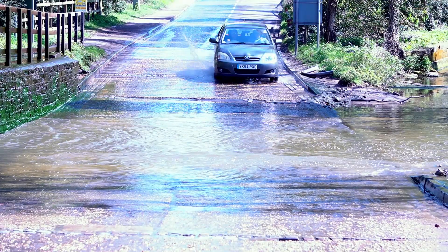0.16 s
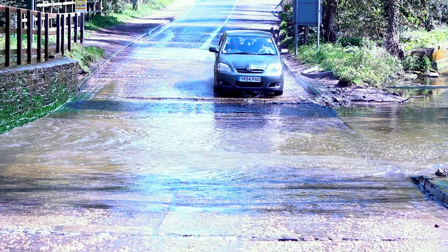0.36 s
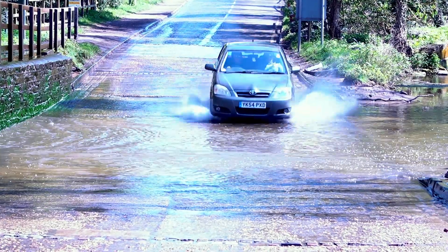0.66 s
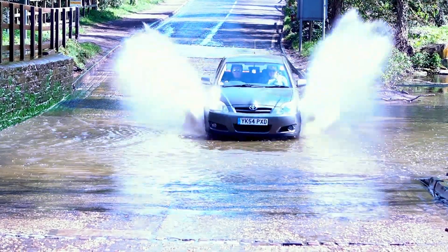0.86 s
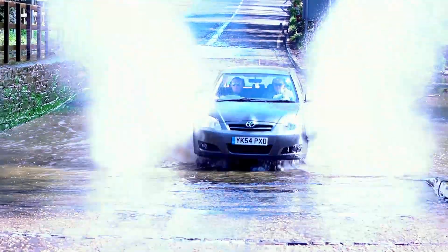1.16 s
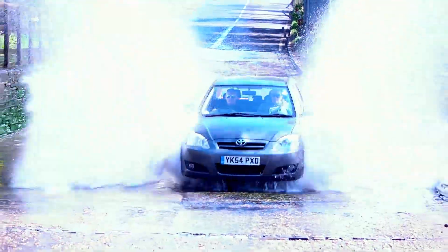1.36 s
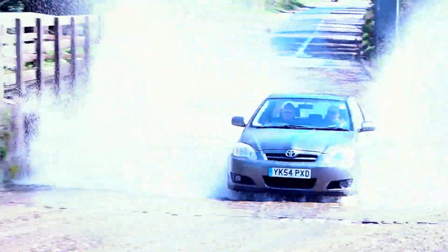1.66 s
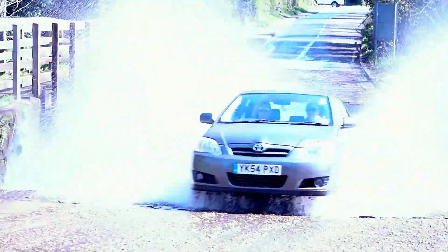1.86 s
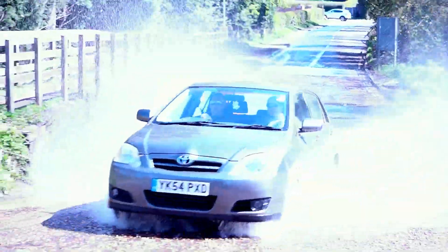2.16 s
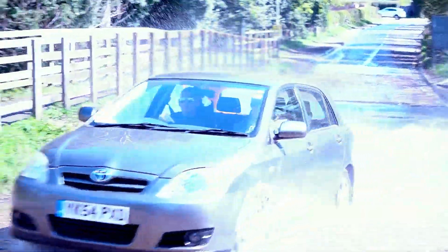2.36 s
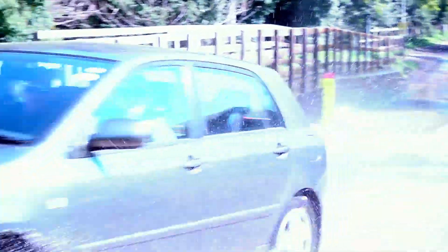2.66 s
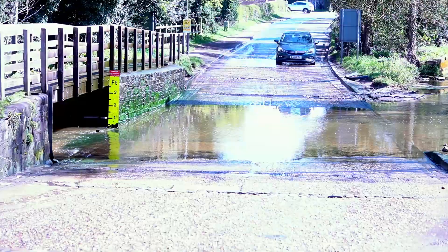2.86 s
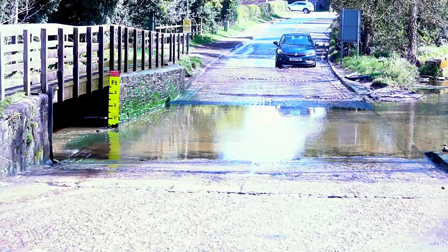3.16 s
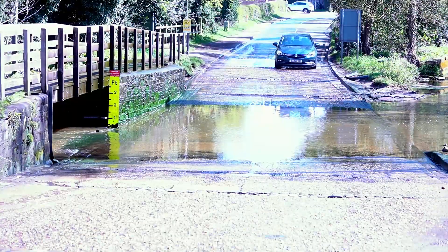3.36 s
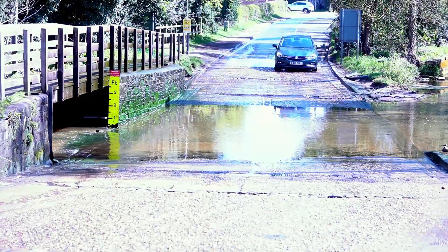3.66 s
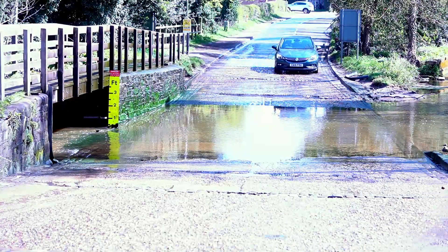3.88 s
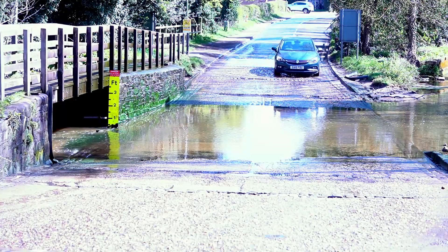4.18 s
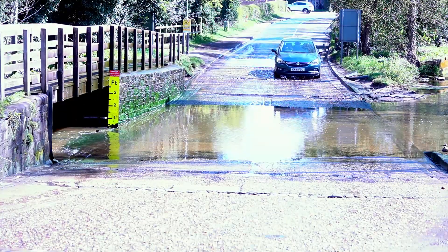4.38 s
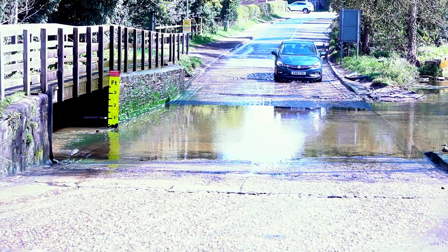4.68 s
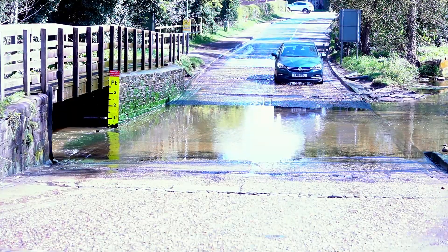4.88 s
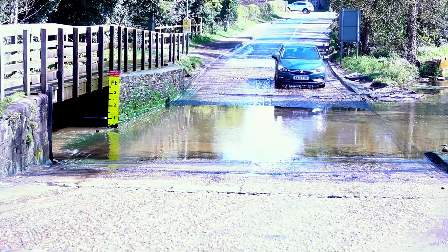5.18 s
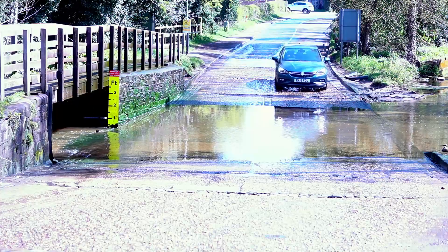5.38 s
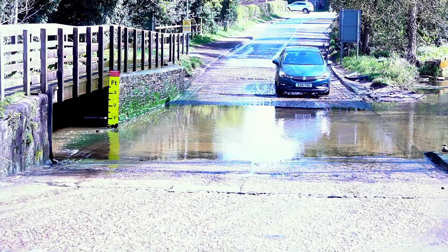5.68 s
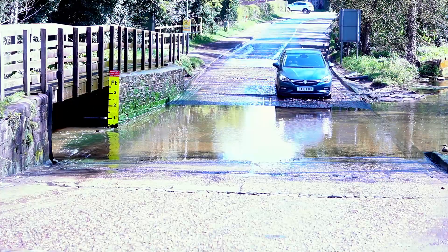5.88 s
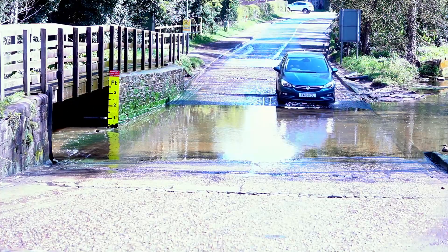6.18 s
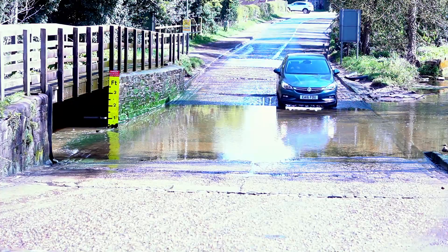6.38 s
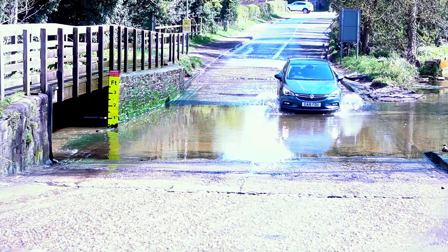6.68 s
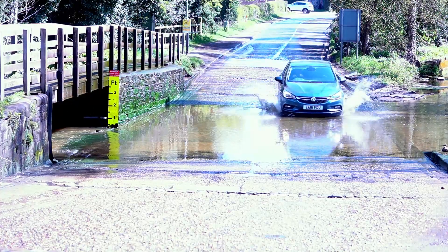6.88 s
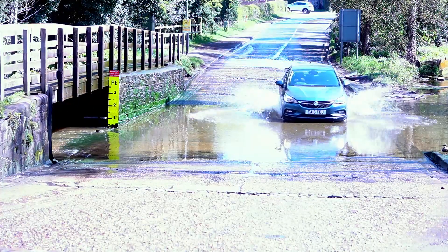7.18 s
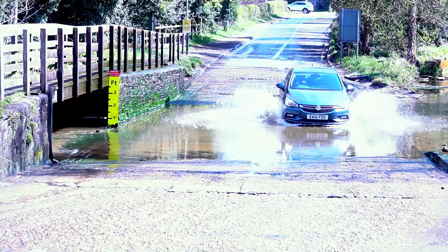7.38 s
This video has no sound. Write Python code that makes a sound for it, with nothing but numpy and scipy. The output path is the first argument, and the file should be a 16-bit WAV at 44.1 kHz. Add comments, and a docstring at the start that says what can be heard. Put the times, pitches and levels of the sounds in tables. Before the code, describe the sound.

Outdoors at a shallow ford, a car rolls up on wet road, slaps into the water and roars closer in dense sheets of spray, loudest as it passes the stereo microphone. A hard cut drops to near quiet: faint distant tyre noise, foot scuffs and crunching grit close by, small bird chirps, then a second car enters the water with a softer, growing splash.

```python
"""A flooded ford on a damp lane: a car rolls up, charges through the water and sweeps past in sheets of spray.
A hard cut leads to the calm ford, where a second car rolls down the lane and eases into the water.
The cars are shaped noise with pattering drops, the slaps and grit are ragged bursts with ringing knocks,
the bird is a bending near-sine with echoes, and narrow noise bands hum behind."""
import sys
import numpy as np
from scipy import signal
from scipy.io import wavfile
from scipy.ndimage import uniform_filter1d

SR = 44100
rng = np.random.default_rng(int(sys.argv[2]) if len(sys.argv) > 2 else 0)


def unload_audio(sound):
    """Save the sound as a 16-bit wav file, at the path given as the first command line argument."""
    columns = np.transpose(np.atleast_2d(sound))
    # keep every value between -1 and 1, then stretch to whole-number steps
    steps = np.round(np.clip(columns, -1, 1) * 32767)
    wavfile.write(sys.argv[1], SR, steps.astype(np.int16))


N = 332514  # length [samples]

# Colours, here and below, set only the balance of pitches; each layer's loudness is set elsewhere.
# Loudness of near car, far car: (time [s], low roar [dB], spray [dB], fine mist [dB])
CAR_LEVELS = ([(0.05, -31.5, -29.5, -54.5), (0.45, -31.5, -28.5, -44), (0.72, -27.5, -27.5, -45),
               (0.84, -24, -28, -41), (0.97, -24.5, -29.5, -39.5), (1.15, -27, -29, -41),
               (1.27, -25.5, -26, -37.5), (1.4, -26, -27, -37), (1.68, -28.5, -26.5, -34),
               (1.9, -25, -28.5, -35.5), (2.05, -24.5, -24, -32), (2.44, -23, -23, -31.5),
               (2.56, -22, -19.5, -32.5), (2.69, -22.5, -23.5, -34.5), (2.83, -23.5, -19.5, -28.5)],
               [(2.84, -47.5, -42.5, -62.5), (3.2, -50, -58, -58), (3.56, -48.5, -50, -68),
               (3.9, -49.5, -50.5, -70), (4.6, -48.5, -57, -80), (5.45, -48.5, -57.5, -76),
               (5.85, -48, -56, -71), (6.1, -48, -46, -58), (6.7, -46.5, -45.5, -53), (7.0, -45, -46, -52),
               (7.42, -42.5, -42, -49), (7.54, -40, -39.5, -43.5)])
# The sound starts, then cuts from near car to far car: (start [s], cut [s])
START_AND_CUT = (.046, 2.836)
# Middle of each car's turn from damp road to water: (near car [s], far car [s])
INTO_WATER = (0.59, 5.67)
# Engine and tyre rumble, near car, far car: (pitch [Hz], level per Hz [dB])
RUMBLE_COLOURS = ([(25, -59), (59, 0), (103, 3), (172, -1.5), (243, 1), (360, -8), (400, -35), (880, -120)],
                   [(25, -32), (96, 4), (141, -5), (172, -8), (237, -8.5), (263, -7.5), (400, -19),
                   (880, -120)])
# Tyres rolling on damp road, near car, far car: (pitch [Hz], level per Hz [dB])
ROLL_COLOURS = ([(190, -46), (330, -18), (399, -9.5), (511, 2), (701, -6), (948, -4.5), (1530, -4),
                 (1970, -15), (2200, -34), (2860, -33), (4840, -120)], [(190, -37), (330, -17), (457, 5.5),
                 (680, -4.5), (904, 1.5), (1240, -4), (1380, -1), (1540, -7), (2860, -28.5), (4840, -120)])
# Churned water, near car, far car: (pitch [Hz], level per Hz [dB])
CHURN_COLOURS = ([(190, -12.5), (330, -19), (399, -11.5), (540, -2.5), (862, -11), (1000, -6), (1330, -11),
                  (1560, -6), (2200, -24.5), (4840, -120)], [(190, -14), (330, -10), (580, -3), (941, -9.5),
                  (1030, -10), (1220, -2.5), (1490, -11.5), (1690, -2.5), (2200, -40), (4840, -120)])
# Loudness relative to the rumble, near car, far car: (rolling [dB], churning [dB])
LEVELS_OVER_RUMBLE = ((2.5, 0.04), (0, 3))
# Hiss of tyres on damp road, near car, far car: (pitch [Hz], level per Hz [dB])
HISS_COLOURS = ([(1120, -11.5), (1900, -6.5), (2880, 1.5), (3780, -12.5), (4500, -11), (5690, -4),
                 (7000, -18.5), (9100, -21), (15400, -120)], [(1120, -33), (1900, 1.5), (2800, -2),
                 (3700, -13), (5570, -8.5), (7000, -31), (15400, -120)])
# Thrown spray, near car, far car: (pitch [Hz], level per Hz [dB])
SPRAY_COLOURS = ([(1120, -16.5), (1900, -2.5), (2750, -3), (3390, -10.5), (4300, -10), (5450, -7),
                  (6350, -13.5), (7000, -20), (9100, -20.5), (15400, -120)], [(1120, -30), (1900, -2),
                  (2250, -2), (3930, -8.5), (5360, -4), (7000, -28), (9100, -20), (15400, -120)])
# Fine mist, near car, far car: (pitch [Hz], level per Hz [dB])
MIST_COLOURS = ([(3710, -39), (6300, -10.5), (7440, -5), (8060, -9.5), (12800, -13.5), (15800, -28.5)],
                 [(3710, -26), (6300, -1.5), (10700, -9), (12600, -17.5), (14300, -25), (15200, -43),
                 (15800, -59)])
# Likeness of left and right in the rushing noise: (pitch [Hz], correlation [0-1])
STEREO_LIKENESS = [(60, .987), (380, .982), (950, 0.94), (2400, 0.72), (6000, .45), (15000, 0.49)]
# Left-right balance of the rushing noise: (pitch [Hz], left over right [dB])
STEREO_BALANCE = [(60, .8), (450, .5), (1500, -2.3), (4970, .3), (15000, 0)]
# Phase by which left leads in the rushing noise: (pitch [Hz], lead [rad])
STEREO_LEAD = [(300, 0), (2900, .5), (4700, -.3), (9500, .5)]

# Slaps of water on tyres and body: (time [s], fizz [dB], thud pitch [Hz], thud [dB])
WATER_SLAPS = [(.295, -22.5, 895, -27), (.33, -24.5, 910, -24), (.405, -24.5, 900, -42),
               (.492, -25, 900, -51), (.555, -23, 900, -47), (.61, -25, 110, -17), (.96, -31.5, 114, -19),
               (2.03, -35, 537, -17.5), (2.508, -37, 1020, -22), (6.73, -41, 550, -38),
               (7.508, -50, 138, -26.5)]
# Fizz of the slaps: (pitch [Hz], level per Hz [dB])
FIZZ_COLOUR = [(1500, -39), (3000, 16), (4200, 9.5), (5500, 12), (8500, -0.5), (13000, -7.5), (16000, -41)]
SLAP_SHARPNESS = 1.7  # low, for broad thuds: pitch over width of each resonator

# Crunches of grit: (time [s], snap [dB], knock pitch [Hz], knock [dB])
GRIT_CRUNCHES = [(3.4835, -53, 1900, -37.5), (3.5352, -41, 950, -41), (3.777, -39, 915, -49),
                 (3.796, -44, 2680, -44), (3.861, -49, 2480, -45), (3.876, -44, 2290, -38),
                 (3.981, -41, 2520, -41), (4.012, -49, 2500, -41), (4.0411, -50, 2500, -44),
                 (4.0726, -36.5, 2680, -41), (4.108, -44, 2600, -44), (4.162, -50, 2200, -47),
                 (4.1869, -43, 2540, -50), (4.207, -52, 2660, -40), (4.2295, -44, 1390, -33.5),
                 (4.595, -52, 2830, -44), (4.6199, -60, 2770, -48), (4.681, -58, 2480, -45),
                 (4.707, -53, 1420, -39), (4.7532, -46, 2530, -36), (4.77, -51, 2650, -42),
                 (4.837, -41.5, 2920, -53), (4.8706, -49, 3000, -54), (4.979, -41, 2780, -54),
                 (5.009, -46, 1500, -42), (5.134, -37, 1110, -48), (5.1527, -38, 1120, -36),
                 (5.188, -45, 1040, -42), (5.6925, -40, 1180, -43), (5.752, -42.5, 1180, -35.5),
                 (5.7918, -44, 1330, -50), (5.9254, -39, 1390, -32), (5.9918, -29.5, 1730, -32.5),
                 (6.0248, -38, 1300, -33), (6.0534, -31, 1360, -32), (6.178, -36.5, 1690, -35.5),
                 (6.4373, -38, 1220, -38), (6.499, -33.5, 1760, -40), (6.509, -34, 1400, -39),
                 (6.532, -35, 1240, -40), (6.545, -32, 1500, -40), (6.583, -36, 1670, -38)]
# Snaps of the crunches: (pitch [Hz], level per Hz [dB])
CRUNCH_COLOUR = [(710, -32), (1200, 3), (2200, 3), (2950, 8.5), (3500, 1.5), (5200, 6.5), (7090, -11),
                 (8600, -7.5), (9400, -19.5), (11000, -21), (15500, -77)]
# Scuffs of feet on grit: (start [s], length [s], level [dB])
FOOT_SCUFFS = [(2.825, 0.25, -51.5), (3.091, 0.39, -44.5), (3.692, 0.22, -55.5), (3.893, 0.33, -53.5),
               (4.095, 0.034, -54.5), (4.672, 0.15, -53.5), (4.835, 0.041, -56), (4.97, 0.035, -53),
               (5.13, 0.058, -52), (5.534, 0.22, -52), (5.866, 0.24, -47), (6.33, 0.091, -50),
               (6.484, 0.095, -47), (6.69, 0.074, -51)]
# Crackle of the scuffs: (pitch [Hz], level per Hz [dB])
SCUFF_COLOUR = [(1100, -21.5), (1900, 0.5), (2800, 0), (3500, -8), (4800, -4.5), (7000, -15), (15500, -68)]
SCUFF_RISE_S, SCUFF_FADE_DB_PER_S = 0.027, 139

# Bird notes: (start [s], length [s], first pitch [Hz], middle pitch [Hz], last pitch [Hz], level [dB])
BIRD_NOTES = [(4.34, 0.057, 4430, 4620, 4400, -65), (4.455, 0.086, 5420, 5050, 5300, -69),
              (4.743, .035, 4700, 4560, 4420, -60), (4.823, 0.064, 7250, 6650, 5900, -57),
              (4.902, .022, 5330, 5400, 5500, -61), (4.92, 0.11, 5620, 5840, 5830, -53),
              (5.076, 0.059, 4600, 4450, 4400, -62), (5.21, 0.033, 6020, 5770, 5630, -53),
              (5.238, 0.045, 6300, 4760, 4540, -55), (5.335, .022, 3200, 3400, 3720, -60),
              (5.308, 0.026, 4650, 4680, 4750, -58), (5.348, 0.056, 4840, 4600, 4300, -52),
              (5.66, 0.027, 5420, 5330, 5330, -55), (5.699, 0.019, 5400, 5250, 5300, -53),
              (5.757, 0.039, 5340, 5220, 5100, -57), (5.777, .02, 4840, 4750, 4700, -55),
              (5.898, 0.085, 3700, 3870, 3950, -54), (6.098, 0.031, 7100, 6100, 6470, -44.5),
              (6.121, 0.078, 6150, 6560, 4520, -49.5), (6.29, 0.059, 5750, 5200, 4850, -50),
              (6.382, 0.05, 5000, 5350, 4800, -53), (6.6, 0.043, 4400, 4400, 4150, -48.5),
              (6.681, 0.028, 5300, 5700, 6250, -49), (6.699, 0.019, 6130, 5440, 6000, -48),
              (6.787, 0.055, 4040, 4520, 4330, -45), (6.84, 0.034, 4330, 4380, 4520, -59)]
# Short booms under the near car, faint long drones later: (start [s], end [s], pitch [Hz], width [Hz], level [dB])
HUM_BANDS = [(.803, 0.856, 554, 84, -23.5), (.865, 0.926, 567, 210, -26), (2.644, 2.665, 767, 380, -18.5),
             (3.348, 4.6, 962, 230, -53.5), (4.2, 5.599, 490, 92, -55), (4.303, 6.696, 239, 16, -57.5)]
BAND_LIMIT_HZ = 15850


def car(k, start, end, drop_share, lumpy_db):
    """Rumble, rolling and hiss that turn into churned water and spray, with landing drops and mist."""
    count, t = end - start, np.arange(start, end) / SR
    s, *columns = np.transpose(CAR_LEVELS[k])
    roar_db, spray_db, mist_db = (np.interp(t, s, column) for column in columns)
    roll_gain, churn_gain = gain_of(LEVELS_OVER_RUMBLE[k])

    # equal-power crossfade from road to water over half a second
    angle = np.clip((t - INTO_WATER[k]) / 0.5 + 0.5, 0, 1) * np.pi / 2
    on_road, in_water = np.cos(angle), np.sin(angle)

    rumble = rush(RUMBLE_COLOURS[k], count, patchy_db=-0.3, flicker_db=0.23, size=2048)
    roll = rush(ROLL_COLOURS[k], count, patchy_db=1.04, flicker_db=1.37, size=1024)
    churn = rush(CHURN_COLOURS[k], count, patchy_db=lumpy_db, flicker_db=0.65)
    roar = rumble + roll_gain * on_road * roll + churn_gain * in_water * churn

    hiss = rush(HISS_COLOURS[k], count, patchy_db=0.8, flicker_db=0.9)
    spray = rush(SPRAY_COLOURS[k], count, patchy_db=0.8, flicker_db=0.9)
    drops = drop_share * patter(SPRAY_COLOURS[k], count, per_s=2500, spread_db=4)
    splash = on_road * hiss + in_water * spray + drops

    droplets = drop_share * patter(MIST_COLOURS[k], count, per_s=2500, spread_db=4)
    mist = rush(MIST_COLOURS[k], count, patchy_db=2.1, flicker_db=0.5) + droplets
    return gain_of(roar_db) * roar + gain_of(spray_db) * splash + gain_of(mist_db) * mist


def water_slaps():
    """Water slapping tyres and body: a fizzing burst over a broad, quickly dying thud."""
    return bursts(WATER_SLAPS, FIZZ_COLOUR, rise=0.0024, hold=0.0035, t60=0.13,
                  sharpness=SLAP_SHARPNESS, side_db=-0.5)


def grit():
    """Single crunches, and the crackle of scuffs that rise quickly, hold and die away."""
    t, drag = np.arange(N) / SR, np.zeros(N)
    for s, length, db in FOOT_SCUFFS:
        fade_db = SCUFF_FADE_DB_PER_S * np.maximum(t - s - length, 0)
        drag += np.clip((t - s) / SCUFF_RISE_S, 0, 1) * gain_of(db - fade_db)
    crackle = patter(SCUFF_COLOUR, N, per_s=1500, spread_db=4.2)
    crunches = bursts(GRIT_CRUNCHES, CRUNCH_COLOUR, rise=0.002, hold=0.005, t60=0.045,
                      sharpness=2.6, side_db=-1.5)
    return crunches + drag * crackle


def bird():
    """Near-sine notes bend through three pitches with a slight flutter, smeared by echoes off the trees."""
    song = np.zeros(N)
    for s, length, first_hz, middle_hz, last_hz, db in BIRD_NOTES:
        u = np.linspace(0, 1, round(length * SR))
        # a parabola through the three pitches
        bend_hz = 4 * middle_hz - 2 * first_hz - 2 * last_hz
        hz = first_hz + (last_hz - first_hz) * u + bend_hz * u * (1 - u)
        # smoothing shrinks both noises to about a twelfth
        flutter, throb = uniform_filter1d(rng.standard_normal((2, len(u))), size=150, axis=1)
        phase = 2 * np.pi * np.cumsum(hz * (1 + 0.09 * flutter)) / SR
        tone = np.sqrt(2) * np.sin(phase)
        wavering = gain_of(55 * throb)
        add(song, s, tone * gain_of(db) * wavering * signal.windows.tukey(len(u), 0.55))

    t = np.arange(SR // 3) / SR
    echoes = rng.standard_normal((2, len(t))) * gain_of(-60 * t / 0.5) * (t > 0.006)
    echoes *= gain_of(-2.5) / np.linalg.norm(echoes[0])
    return panned(song, 6.6) + signal.oaconvolve(song[None], echoes, axes=1)[:, :N]


def hum():
    """Narrow bands of noise that waver and swell in and out: slow noise carried on a cosine and a sine."""
    out = np.zeros((2, N))
    for start, end, hz, width, db in HUM_BANDS:
        t = np.arange(round((end - start) * SR)) / SR
        r = np.exp(-np.pi * width / SR)
        slow = signal.lfilter([1], np.convolve([1, -r], [1, -r]), rng.standard_normal((2, len(t))))
        slow /= np.sqrt(np.hypot(*slow) + 1e-9)  # steadier than plain noise
        tone = slow[0] * np.cos(2 * np.pi * hz * t) + slow[1] * np.sin(2 * np.pi * hz * t)
        swell = signal.windows.tukey(len(t), 0.5)
        add(out, start, panned(gain_of(db) * evened(tone) * swell, 0.3))
    return out


def rush(colour, count, patchy_db, flicker_db, size=512):
    """Stereo noise with drifting patches and a flicker shared by all pitches, rms 1."""
    frames, hz = count * 4 // size + 5, np.fft.rfftfreq(size, 1 / SR)
    a, b, c, d, patches = rng.standard_normal((frames, len(hz), 5)).T
    patches = uniform_filter1d(patches, size=8, axis=0)  # across pitch
    patches = evened(uniform_filter1d(patches, size=16, axis=1))  # across time
    flicker = evened(uniform_filter1d(rng.standard_normal(frames), size=5))

    same = np.clip(read(STEREO_LIKENESS, hz), 0, 1)[:, None]
    left, other = a + 1j * b, c + 1j * d
    lag = np.exp(-1j * read(STEREO_LEAD, hz))[:, None]
    right = (same * left + np.sqrt(1 - same ** 2) * other) * lag

    channel_gains = panned(gain_of(read(colour, hz)), read(STEREO_BALANCE, hz))
    spectra = channel_gains[..., None] * np.array([left, right])
    spectra *= gain_of(patchy_db * patches + flicker_db * flicker)
    return evened(signal.istft(spectra, nperseg=size, noverlap=size * 3 // 4)[1][:, :count])


def patter(colour, count, per_s, spread_db):
    """Sparse clicks of uneven size, each landing at one of a dozen spots with its own reflections, rms 1."""
    size = gain_of(spread_db * np.minimum(rng.exponential(1, count), 4))
    clicks = size * (rng.random(count) < per_s / SR)
    spot, out = rng.integers(0, 12, count), np.zeros((2, count))
    t = np.arange(900) / SR
    for place in range(12):
        a, b = rng.standard_normal((2, len(t)))
        reflections = np.array([a + 0.22 * b, a - 0.58 * b]) * gain_of(-60 * t / 0.033)
        out += signal.oaconvolve((clicks * (spot == place))[None], reflections, axes=1)[:, :count]
    return evened(coloured(out, colour))


def bursts(rows, colour, rise, hold, t60, sharpness, side_db):
    """Each event is a ragged noise burst, held briefly and dying, with a short hollow knock."""
    snaps, knocks = np.zeros((2, N)), np.zeros((2, N))
    t = np.arange(0, hold + t60, 1 / SR)
    fade_db = -60 * np.maximum(t - hold, 0) / t60
    shape = panned(np.minimum(t / rise, 1) * gain_of(fade_db), side_db)
    for s, db, hz, knock_db in rows:
        a, b, lumps = rng.standard_normal((3, len(t)))
        lumps = gain_of(3 * evened(uniform_filter1d(lumps, size=90)))
        ragged = evened(np.array([a + 0.69 * b, a - 0.74 * b]) * lumps)
        add(snaps, s, ragged * shape * gain_of(db))

        r = np.exp(-np.pi * hz / sharpness / SR)
        hollow = [1, -2 * r * np.cos(2 * np.pi * hz / SR), r * r]
        ring = signal.lfilter([1, 0, -1], hollow, a)
        ring = signal.lfilter([1], hollow, ring)  # a second pass, for steep skirts
        add(knocks, s, evened(ring * shape) * np.std(shape) * gain_of(knock_db))
    return coloured(snaps, colour) + knocks


def coloured(x, colour):
    """Filters by a spectrum in minimum phase, so clicks do not ring ahead of themselves."""
    hz = abs(np.fft.fftfreq(2048, 1 / SR))
    log_gain = np.log(gain_of(np.maximum(read(colour, hz), -90)))
    taps = np.fft.ifft(np.exp(np.conj(signal.hilbert(log_gain)))).real[:1024]
    return signal.oaconvolve(x, taps[None] / np.linalg.norm(taps), axes=1)[:, :x.shape[1]]


def gain_of(db):
    """Decibels to a factor."""
    return 10 ** (np.asarray(db) / 20)


def evened(x):
    """Scaled to rms 1."""
    return x / np.sqrt(np.mean(x ** 2) + 1e-20)


def read(points, hz):
    """Reads a table over log frequency."""
    f, value = np.transpose(points)
    return np.interp(np.log(hz + 1), np.log(f + 1), value)


def add(mix, s, sound):
    """Mixes a sound in at s seconds."""
    part = mix[..., round(s * SR):][..., :sound.shape[-1]]
    part += sound[..., :part.shape[-1]]


def panned(x, db):
    """Two channels, left louder by db."""
    return np.array([x * gain_of(db / 2), x * gain_of(-db / 2)])


def scene():
    """A moment without cars, the near car, a hard cut, the far car; slaps, grit, bird and hums on top."""
    start, cut = (round(s * SR) for s in START_AND_CUT)
    near = car(0, start, cut, drop_share=0.14, lumpy_db=1.3)
    far = car(1, cut, N, drop_share=0.068, lumpy_db=1.8)
    near[:, :200] *= np.linspace(0, 1, 200)  # soft start
    cars = np.hstack([np.zeros((2, start)), near, far])
    return cars + water_slaps() + grit() + bird() + hum()


def record(dry):
    """Removes the treble above the band limit with a steep low-pass."""
    low_pass = signal.firwin(511, BAND_LIMIT_HZ, window=("kaiser", 9), fs=SR)
    return signal.oaconvolve(dry, low_pass[None], "same")


dry = scene()
out = record(dry)
unload_audio(out)
```